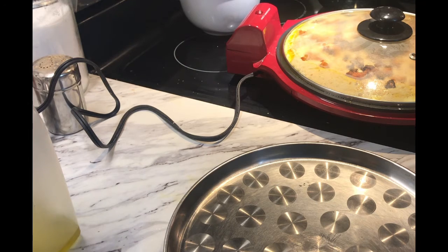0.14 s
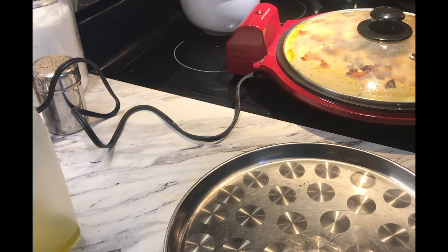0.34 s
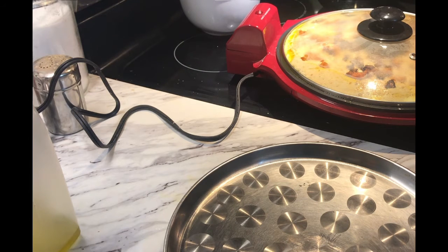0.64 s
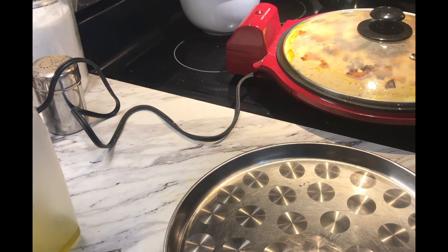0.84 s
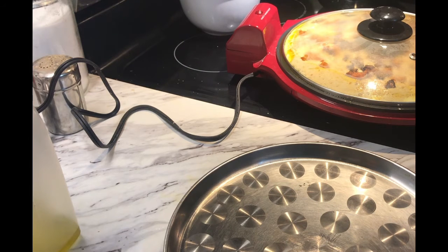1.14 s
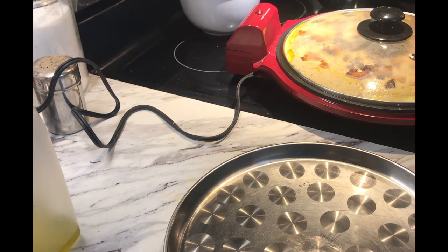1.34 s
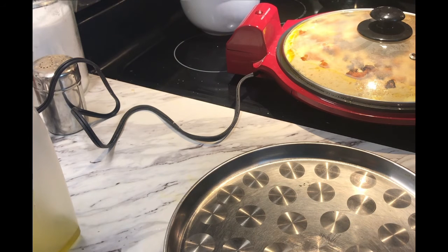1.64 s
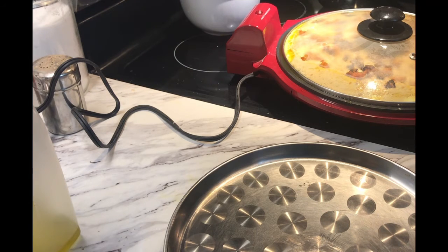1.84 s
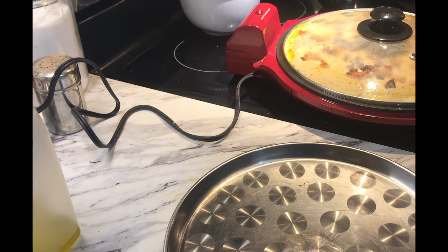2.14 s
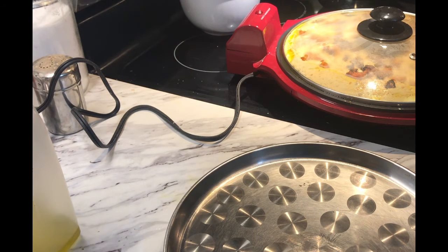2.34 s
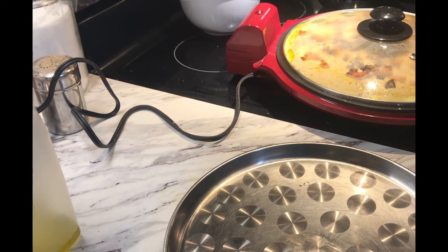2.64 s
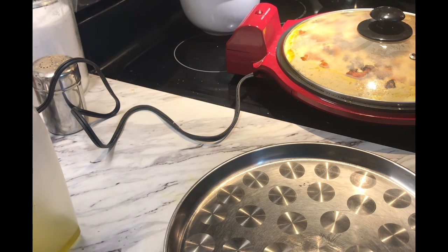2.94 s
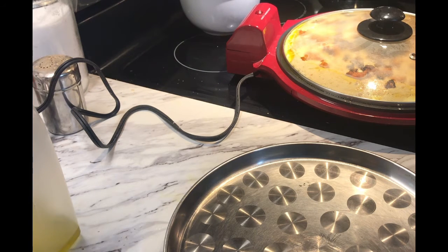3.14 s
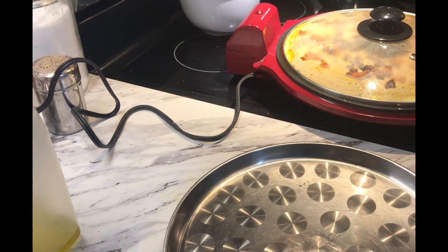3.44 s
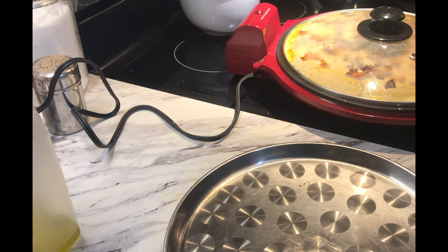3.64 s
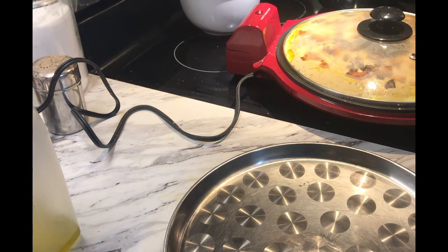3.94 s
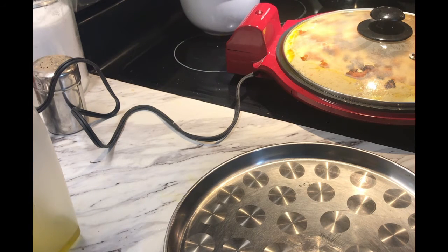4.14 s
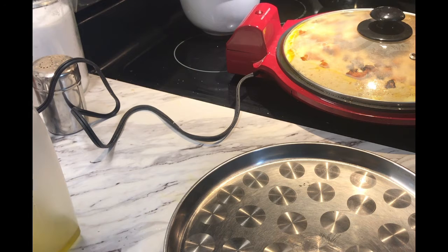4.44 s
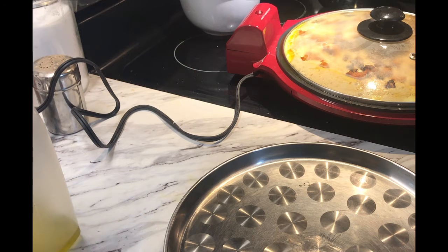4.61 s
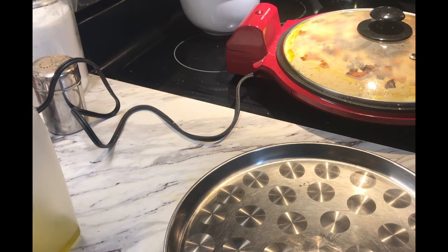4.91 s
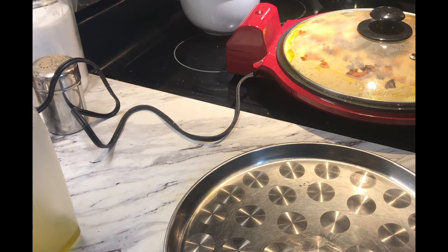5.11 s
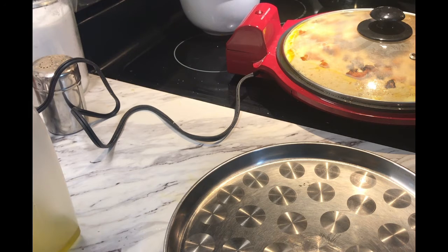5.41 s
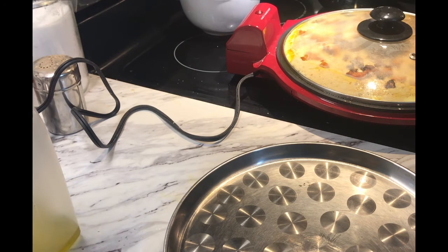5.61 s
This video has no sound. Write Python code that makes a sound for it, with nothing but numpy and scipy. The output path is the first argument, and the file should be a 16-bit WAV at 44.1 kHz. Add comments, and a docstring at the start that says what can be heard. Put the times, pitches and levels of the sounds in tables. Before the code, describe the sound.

Close by in a small kitchen, a covered grill pan crackles and pops irregularly as juice boils off the hot plate. Soft bubbling runs beneath the crisp sizzle, with a slight ring from the pan. Several short, whistling steam squeaks come in the second half, followed by a brief lull and more sputtering. An appliance motor hums low and steady throughout.

```python
"""Simmering in a grill pan.

Food simmers under the glass lid of an electric grill pan in a small kitchen. Juice spits onto the
hot plate and boils off in uneven spurts, sauce bubbles along and single bubbles snap, all coloured
by pan, counter and walls. A few puffs of steam squeak out; an appliance motor hums low."""
import sys
import numpy as np
from scipy import signal
from scipy.fft import rfft, irfft
from scipy.io import wavfile

SR = 44100
rng = np.random.default_rng(int(sys.argv[2]) if len(sys.argv) > 2 else 0)


def dump(signal):
    """Clip the signal to [-1, 1] and save it as 16-bit WAV at the path in sys.argv[1]."""
    limited = np.clip(np.atleast_2d(signal).T, -1, 1)
    pcm = np.round(limited * 32767).astype(np.int16)
    wavfile.write(sys.argv[1], SR, pcm)


N = 254440
TIME_S = np.arange(N) / SR
TYPICAL_SIZZLE_DB = -35

# juice hitting the hot plate: (time [s], spreading time [s], relative level [dB])
JUICE_SPURTS = [(0.0, 0.001, -35), (0.018, 0.11, -41), (0.139, 0.029, -25), (0.209, 0.0024, -34.5),
                (0.401, 0.017, -36.5), (0.55, 0.097, -49.5), (0.709, 0.0023, -28.5), (0.818, 0.033, -38),
                (0.901, 0.011, -25.5), (0.978, 0.016, -26), (1.02, 0.053, -27), (1.164, 0.016, -38),
                (1.484, 0.067, -41.5), (1.63, 0.033, -37.0), (1.782, 0.035, -34.5), (2.088, 0.022, -41.5),
                (2.184, 0.091, -38), (2.43, 0.052, -40.0), (2.642, 0.034, -27.5), (2.682, 0.16, -41),
                (3.045, 0.03, -48.5), (3.252, 0.13, -40.5), (3.468, 0.027, -36.5), (3.53, 0.037, -36.0),
                (3.695, 0.019, -36), (3.746, 0.038, -33), (3.991, 0.01, -46), (4.025, 0.026, -31.5),
                (4.114, 0.0057, -25.5), (4.275, 0.02, -32.5), (4.313, 0.061, -31.5), (4.472, 0.046, -32),
                (5.123, 0.018, -40.5), (5.182, 0.0098, -30), (5.277, 0.006, -38.5), (5.345, 0.0085, -40),
                (5.434, 0.059, -34), (5.607, 0.067, -35.5), (5.677, 0.066, -34.0)]
# fineness of the spray: (time [s], treble lift and equal cut below it [dB])
SPRAY_TILT = [(0, 4.5), (.8, 7), (.92, 0), (1.1, 3.5), (3.0, 4), (3.8, 4), (4.1, 3), (5.77, -0.2)]
# sizzle colour: (frequency [Hz], gain [dB])
SIZZLE_EQ = [(1000, -34), (1800, -4), (2600, 1.5), (4000, 0.5), (6000, 0), (7800, -4), (8900, -1.5),
             (10300, -9), (11400, -2), (14000, -4.5), (15800, -10)]
# bubbling against the sizzle: (time [s], lift [dB])
BUBBLING_TRIM = [(0, 1), (0.7, -1), (1.1, -4.5), (2.18, 0), (2.33, 0.5), (2.5, -4), (3.1, -1.5), (3.5, 1.5),
                 (4.15, 1.5), (4.7, -0.5), (5.77, -3.5)]
# bubbling colour: (frequency [Hz], gain [dB])
BUBBLING_EQ = [(120, 1), (190, -2), (235, -4), (290, 2), (380, 4), (465, -9.5), (560, 3), (1250, -0.5),
               (1700, -3.5), (2600, -2), (4500, 2)]
# room rumble colour: (frequency [Hz], gain [dB])
RUMBLE_EQ = [(21, -46), (30, -9), (40, 2), (70, 2.5), (130, 0), (180, -5.5), (240, -16.5), (400, -16),
             (1000, -22.5), (3000, -20), (15000, -38.5)]
# loudest single bubbles: (time [s], relative level [dB], relative body weight [dB])
BUBBLE_POPS = [(0.0383, -21, -14.5), (0.149, -14, -30), (0.3645, -20, -40), (0.5338, -24, -16.5),
               (0.7139, -16, -17.5), (0.811, -18, -21), (0.9026, -7, -30), (0.9368, -15, -16),
               (0.9847, -9, -42), (1.0303, -9.5, -24), (1.34, -29, -28), (1.5147, -22.5, -23),
               (1.5681, -14.5, -20), (1.7538, -16.5, -22.5), (1.808, -30, -21), (1.929, -23, -19),
               (2.099, -33, -3), (2.1602, -19, -21), (2.2058, -19, -35), (2.265, -16, -33),
               (2.2995, -20, -9), (2.3769, -19.5, -19.5), (2.977, -22.5, -22), (3.595, -17, -29),
               (4.115, -21.5, -6.5), (4.385, -13, -18), (4.796, -20.5, -8.5), (4.9, -31.5, -40),
               (4.997, -30, -13), (5.1202, -28, -10), (5.1755, -16, -22), (5.4452, -31, -6)]
# escaping steam: (time [s], attack [s], pitch [Hz], level [dB], initial roughness [0-1])
STEAM_PUFFS = [(2.848, 0.0041, 1084, -38, 0.44), (3.732, 0.0043, 3060, -18.5, 0.23),
               (3.774, 0.01, 3080, -29, 0.36), (4.037, 0.0052, 1084, -35, 0),
               (4.114, 0.0071, 1143, -22.5, 0.37), (4.37, 0.012, 1086, -26.5, 0.08)]
# pan and air under the lid: (frequency [Hz], width [Hz], gain re direct [dB])
PAN_MODES = [(752, 30, -8.5), (1082, 65, 4), (1240, 270, -15), (2405, 50, -9), (5510, 73, -7)]
# room decay: (frequency [Hz], T60 [s])
ROOM_DECAY = [(200, 0.25), (1000, 0.16), (4000, 0.2), (9000, 0.11), (16000, 0.04)]


def from_db(db):
    """Decibels to gain."""
    return 10 ** (np.asarray(db) / 20)


def unit_rms(x):
    """Scale to rms 1."""
    return x / np.sqrt(np.mean(x ** 2) + 1e-20)


def at_hz(points, hz):
    """Interpolate a table over log frequency."""
    known_hz, values = np.transpose(points)
    return np.interp(np.log(np.maximum(hz, 1)), np.log(known_hz), values)


def band(x, low_hz, high_hz):
    """Butterworth band-pass."""
    sos = signal.butter(2, [low_hz, high_hz], "band", fs=SR, output="sos")
    return signal.sosfilt(sos, x + 1e-18)


def drift(corner_hz, hop=40, warmup=2000):
    """Low-passed random wander, rms 1."""
    r = np.exp(-2 * np.pi * corner_hz * hop / SR)
    white = rng.standard_normal(N // hop + warmup + 2)
    slow = signal.lfilter([1], [1, -2 * r, r * r], white)[warmup:]
    return np.interp(np.arange(N) / hop, np.arange(len(slow)), unit_rms(slow))


def colour(x, eq, size=8192):
    """Minimum-phase filter from a gain table."""
    gain = from_db(at_hz(eq, np.arange(size // 2 + 1) * SR / size))
    cepstrum = irfft(np.log(gain))
    cepstrum[1:size // 2] *= 2
    cepstrum[size // 2 + 1:] = 0
    impulse = irfft(np.exp(rfft(cepstrum)))
    return signal.fftconvolve(x, impulse)[:len(x)]


def resonance(x, hz, width_hz):
    """Two-pole resonator, peak gain 1."""
    r = np.exp(-np.pi * width_hz / SR)
    feedback = [1, -2 * r * np.cos(2 * np.pi * hz / SR), r * r]
    return signal.lfilter(np.array([1, 0, -1]) * (1 - r * r) / 2, feedback, x + 1e-18)


def linger(power, t60_s):
    """Spread energy over an exponential decay."""
    r = 1e-6 ** (1 / (t60_s * SR))
    return signal.lfilter([0, 1 - r], [1, -r], power)


def add(out, start_s, sound):
    """Mix a sound in at a time."""
    start = int(start_s * SR)
    out[start:start + len(sound)] += sound[:max(N - start, 0)]


def boil_off(rest_db=-67, droplet_t60_s=0.14, t60_per_spread=6.02):
    """Frying envelope: each spurt swells as it spreads; the longer it spreads, the slower it dies."""
    power, t = np.zeros(N), TIME_S[:SR]
    for start_s, spread_s, db in JUICE_SPURTS:
        t60_s = droplet_t60_s + t60_per_spread * spread_s
        decay_db = 60 * np.maximum(t - spread_s, 0) / t60_s
        swell = np.minimum(t / spread_s, 1) * from_db(db - decay_db)
        add(power, start_s, swell ** 2)
    return np.hypot(np.sqrt(power), from_db(rest_db))


def bursts(per_s, spread_db, low_hz, high_hz, q, pitch_count=16):
    """Bubbles burst at random, most weak, a few strong, each ringing briefly at one pitch; rms 1."""
    sizes = from_db(spread_db * np.minimum(rng.exponential(1, N), 4.5)) * rng.choice([-1, 1], N)
    clicks = sizes * (rng.random(N) < per_s / SR) / np.sqrt(per_s)
    pitch_index = rng.integers(0, pitch_count, N)
    pitches_hz = np.geomspace(low_hz, high_hz, pitch_count)
    rings = (resonance(clicks * (pitch_index == k), hz, hz / q) for k, hz in enumerate(pitches_hz))
    return unit_rms(sum(rings))


def sizzle(frying, gain_db=-0.54, flicker_db=0.98, tilt_drift_db=1.6, stray_db=-54, stray_follow=0.17):
    """The more juice boils off, the denser the crackle; stray droplets tick on between spurts."""
    per_s = 2000 * (frying / np.mean(frying)) ** 0.8
    crackle = bursts(per_s, spread_db=3, low_hz=1190, high_hz=15800, q=1.4)
    lows = signal.sosfiltfilt(signal.butter(1, 6000, fs=SR, output="sos"), crackle)
    fineness = from_db(np.interp(TIME_S, *np.transpose(SPRAY_TILT)) - tilt_drift_db * drift(18))
    tilted = lows / fineness + (crackle - lows) * fineness
    spray = tilted * frying * from_db(flicker_db * drift(39))
    strays = from_db(stray_db) * bursts(per_s=45, spread_db=5, low_hz=2940, high_hz=16000, q=2.5)
    strays *= (frying / from_db(TYPICAL_SIZZLE_DB)) ** stray_follow
    heard = kitchen(spray + strays, early_db=-3.5, tail_db=-6)
    return from_db(gain_db) * colour(heard, SIZZLE_EQ)


def bubbling(frying, gain_db=-42, follow=0.6):
    """Bigger bubbles burst in the sauce, lower and longer, following part of the sizzle's swing."""
    trim_db = np.interp(TIME_S, *np.transpose(BUBBLING_TRIM))
    envelope = from_db(gain_db + trim_db) * (frying / from_db(TYPICAL_SIZZLE_DB)) ** follow
    blips = envelope * bursts(per_s=2200, spread_db=3.5, low_hz=189.4, high_hz=4100, q=3.1)
    return colour(kitchen(blips, early_db=-4, tail_db=-2), BUBBLING_EQ)


def motor_hum(turn_hz=56.84, rms_db=-50, waver_db=0.7):
    """A motor hums at its turning rate; the level wavers slowly."""
    return np.sqrt(2) * np.sin(2 * np.pi * turn_hz * TIME_S) * from_db(rms_db + waver_db * drift(1.5))


def room_rumble(rms_db=-49):
    """Steady low noise of the room."""
    return from_db(rms_db) * unit_rms(colour(rng.standard_normal(N), RUMBLE_EQ))


def pops(snap_s=0.00055, body_s=0.002, bounce_db=-3, typical_db=-20, dulling_db_per_db=0.16):
    """Single bubbles snap, the bigger the duller; a duller bounce follows about 3 ms later."""
    out, t = np.zeros(N), TIME_S[:SR // 50]
    snap = np.exp(-t / snap_s)
    lags_s = rng.uniform(0.0022, 0.0042, len(BUBBLE_POPS))
    noises = rng.standard_normal((len(BUBBLE_POPS), 3, len(t)))
    for (start_s, db, body_db), noise, lag_s in zip(BUBBLE_POPS, noises, lags_s):
        top_db = 0.5 - dulling_db_per_db * (db - typical_db)
        body = from_db(body_db + 10.5) * unit_rms(band(noise[0] * np.exp(-t / body_s), 440, 2400))
        crack = unit_rms(band(noise[1] * snap, 3740, 7500))
        top = from_db(top_db) * unit_rms(band(noise[2] * snap, 10100, 15400))
        gain = from_db(db - 24)
        add(out, start_s, gain * (crack + body + top))
        add(out, start_s + lag_s, gain * from_db(bounce_db) * (crack + body + 0.5 * top))
    return kitchen(out, early_db=-4.5, tail_db=-6.5)


def steam_squeaks(t60_s=0.18, sputter_per_s=3.9, wobble_hz=170, flutter_db=4,
                  tail_db=-11, tail_t60_s=0.25):
    """Steam whistles, sputters more as its pressure is spent, and rings on briefly in the room."""
    out, t = np.zeros(N), TIME_S[:SR // 2]
    flutter, wobble = drift(140), drift(136)
    for start_s, attack_s, hz, db, roughness in STEAM_PUFFS:
        span = int(start_s * SR) + np.arange(len(t))
        sputter = np.minimum(roughness + sputter_per_s * t, 1)
        pitch_hz = hz + sputter * wobble_hz * wobble[span]
        decay_db = 60 * np.maximum(t - attack_s, 0) / t60_s
        level_db = db - decay_db + sputter * flutter_db * flutter[span]
        envelope = np.minimum(t / attack_s, 1) * from_db(level_db)
        add(out, start_s, envelope * np.sin(2 * np.pi * np.cumsum(pitch_hz) / SR))
    tail = rng.standard_normal(len(t)) * from_db(-60 * t / tail_t60_s)
    return out + from_db(tail_db) * signal.fftconvolve(out, tail / np.linalg.norm(tail))[:N]


def kitchen(x, early_db, tail_db, early_t60_s=0.05):
    """Each burst comes from another spot, so its echoes are fresh noise: near scatter, then room tail."""
    out, edges_hz = x.copy(), np.geomspace(150, 18000, 9)
    white = rng.standard_normal((2, N))
    for k, (low_hz, high_hz) in enumerate(zip(edges_hz, edges_hz[1:])):
        power = band(x, low_hz, high_hz) ** 2
        early = from_db(early_db) ** 2 * linger(power, early_t60_s)
        tail = from_db(tail_db) ** 2 * linger(power, at_hz(ROOM_DECAY, np.sqrt(low_hz * high_hz)))
        out += np.sqrt(early + tail) * unit_rms(band(white[k % 2], low_hz, high_hz))
    return out


def pan(x):
    """The pan and the air under its lid ring along."""
    return x + sum(from_db(db) * resonance(x, hz, width_hz) for hz, width_hz, db in PAN_MODES)


def counter(x, echo_db=-12.5, t60_s=0.12, gap_s=0.002):
    """Counter, hob and tray return the same quick echoes for every burst, rippling the spectrum."""
    t = TIME_S[:SR // 8]
    impulse = rng.standard_normal(len(t)) * from_db(-60 * t / t60_s) * (t > gap_s)
    echoes = signal.fftconvolve(x, impulse / np.linalg.norm(impulse))[:N]
    share = from_db(echo_db)
    return (x + share * echoes) / np.hypot(1, share)


def scene():
    """Pan and room, heard from the counter; mono."""
    frying = boil_off()
    food = pan(sizzle(frying) + bubbling(frying) + pops())
    return (counter(food) + steam_squeaks() + motor_hum() + room_rumble())[None]


def record(dry):
    """Steep low-pass at 15.9 kHz."""
    return signal.sosfilt(signal.ellip(10, 0.2, 70, 15900, fs=SR, output="sos"), dry)


dry = scene()
out = record(dry)
dump(out)
```